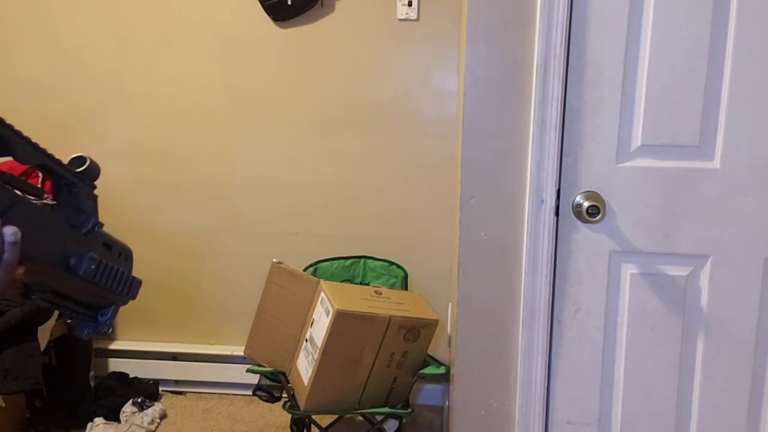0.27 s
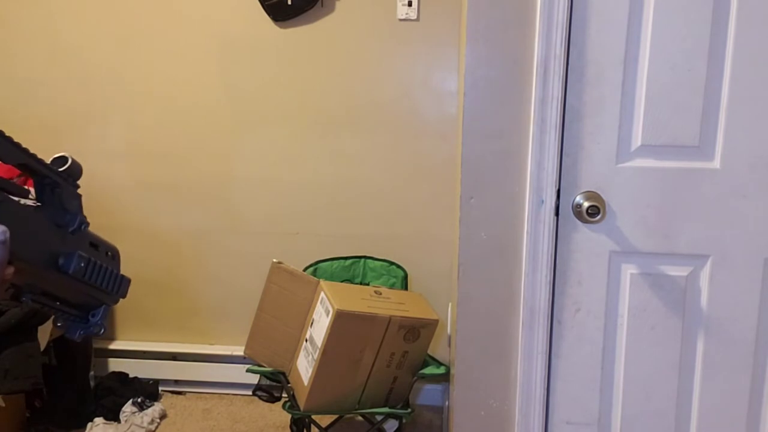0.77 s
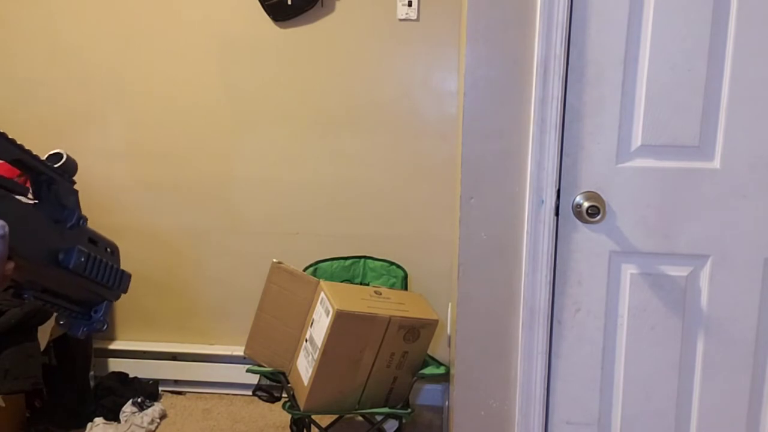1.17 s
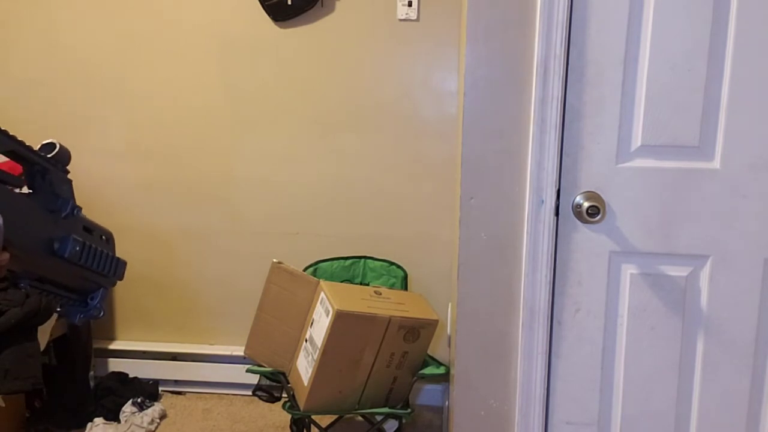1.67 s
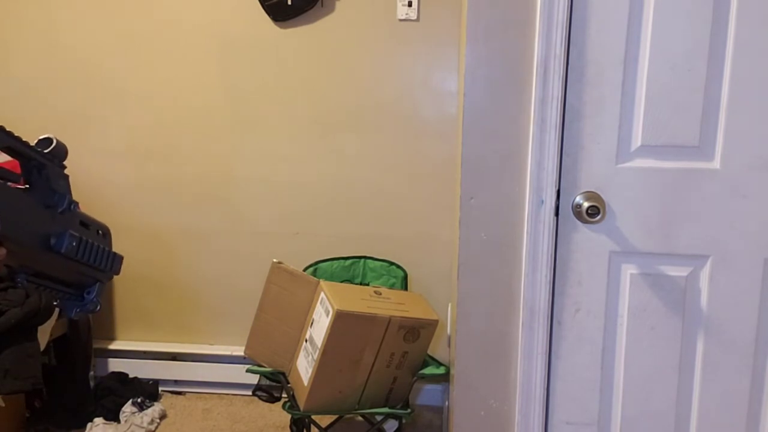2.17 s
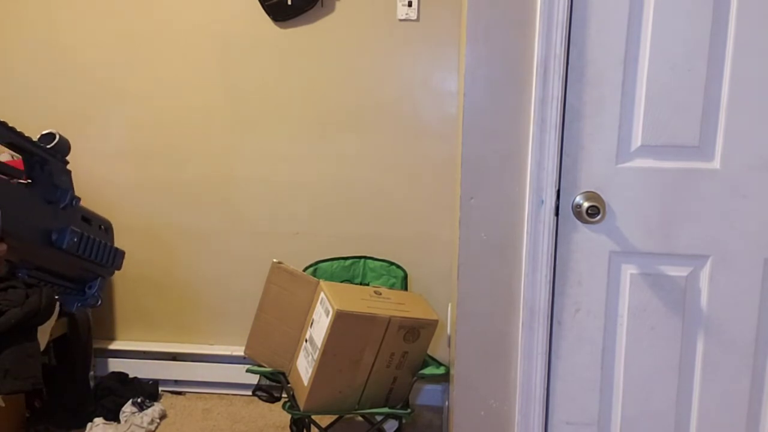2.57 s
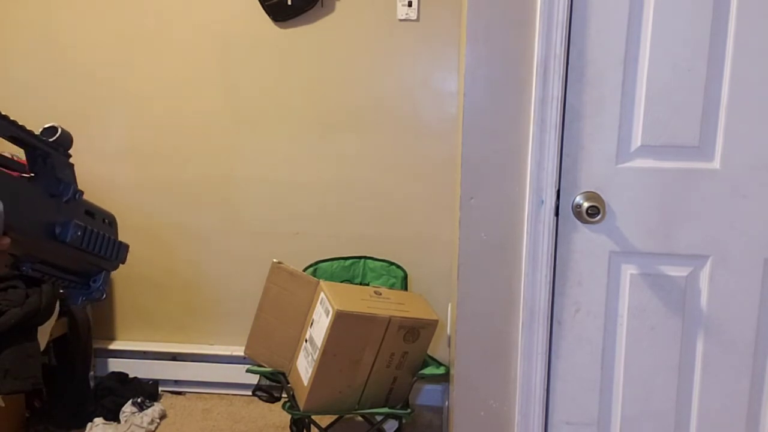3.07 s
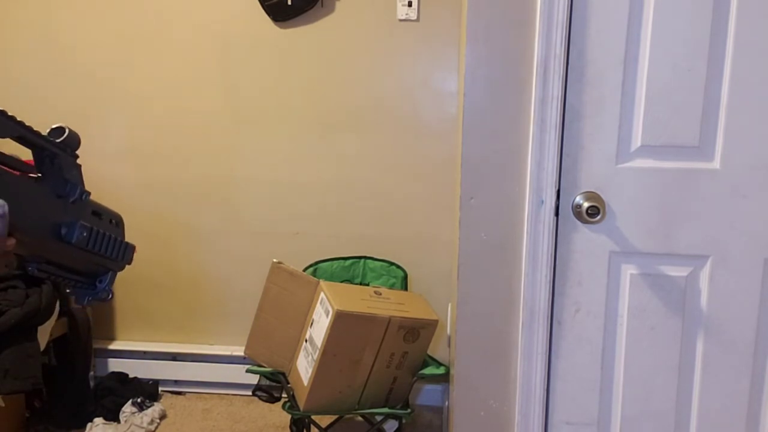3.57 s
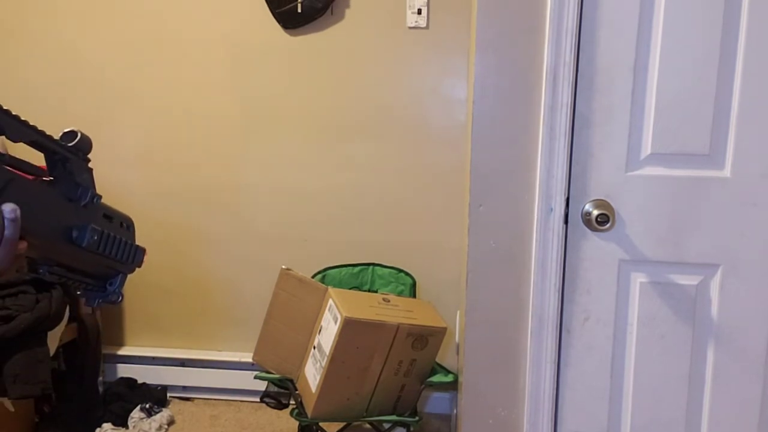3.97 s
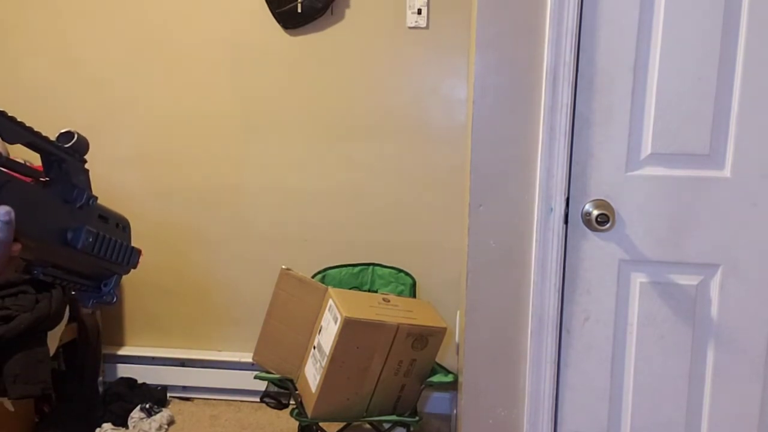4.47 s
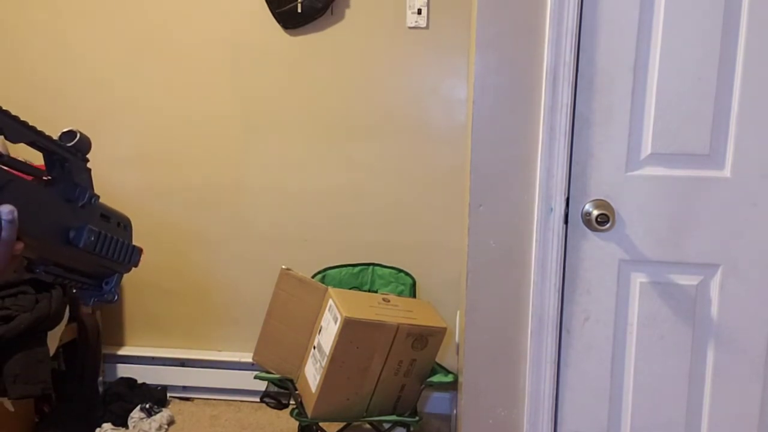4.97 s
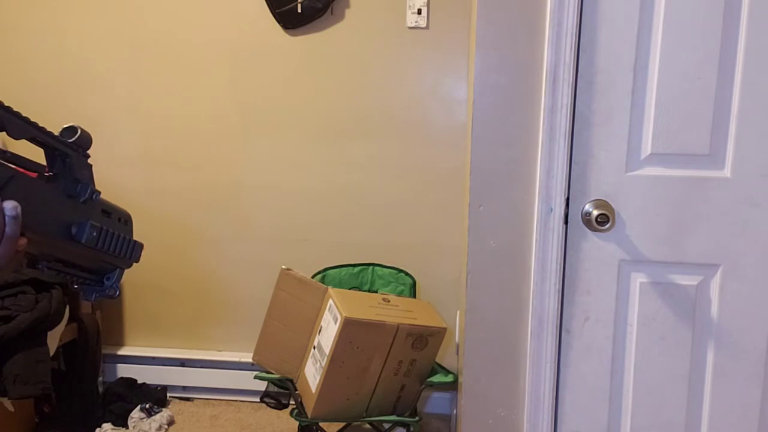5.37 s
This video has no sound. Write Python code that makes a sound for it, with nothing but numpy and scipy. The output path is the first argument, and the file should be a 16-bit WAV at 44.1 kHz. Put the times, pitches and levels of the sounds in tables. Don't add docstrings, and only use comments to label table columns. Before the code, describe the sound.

Quiet room air and low mains hum with a few light clicks and taps for about a second, then uneven semi-automatic airsoft fire until the end. Every shot has a roughly tenth-second motor zip rising into a loud, dry piston slap, followed at once by the pellet striking a cardboard box across the room and a short, hard-walled reverberation. Close, bass-light, limited sound.

```python
import sys
import numpy as np
from scipy import signal
from scipy.fft import rfft, irfft
from scipy.io import wavfile
from scipy.ndimage import uniform_filter1d

SR = 44100
rng = np.random.default_rng(int(sys.argv[2]) if len(sys.argv) > 2 else 0)


def makeup_ratio(level_db):
    decades = np.asarray(level_db, float) / 20
    return 10 ** decades


def persist_wave(psi):
    counts = np.round(np.clip(psi, -1, 1) * 32767).astype(np.int16)
    wavfile.write(sys.argv[1], SR, np.atleast_2d(counts).T)


N = 247401

SHOT_S = [1.0505, 1.3931, 1.6928, 2.3127, 2.582, 3.1185, 3.4182, 3.6965, 3.9738, 4.2588, 4.8169, 5.0992,
          5.5655]
# [start t/s, motor level/dB, first bite of the gears level/dB]
WINDING = [(0.956, -16.5, -16.5), (1.305, -25, -27), (1.6, -25.5, -33.5), (2.219, -26.5, -45),
           (2.49, -25.5, -33.5), (3.025, -27, -31), (3.324, -25.5, -30), (3.599, -26, -18),
           (3.876, -25.5, -18), (4.169, -24.5, -17.5), (4.727, -26, -38), (5.002, -27.5, -21.5),
           (5.472, -26, -41)]


def pop():
    # [f/Hz, level/dB]
    blast_spectrum = [(35, -93.5), (60, -10.5), (715, -5.5), (785, -1.5), (882, -2.5), (1220, 0),
                      (1740, -5.5), (2410, -7.5), (4530, -8), (5590, -6.5), (6740, 2.5), (10000, -15),
                      (13600, -21.5), (16000, -27.5)]
    # [f/Hz, level/dB, t60/s]
    barrel_modes = [(780, -4, .012), (2150, -10, .008)]
    # [f/Hz, level/dB, t60/s]
    release_modes = [(187, -46.5, 0.033), (841, -23.5, 0.012), (2420, -23, 0.0075)]
    # [delay t/ms, level/dB, sign]
    first_echoes = [(4.6, -3, -1), (6.4, -1, 1), (7.2, -4, 1), (10.3, -3, 1), (12.0, -6, -1),
                    (20.4, -4, -1)]
    shot_s = np.array(SHOT_S)
    slam = clicks(shot_s, 0)
    walls = sum(sign * clicks(shot_s + ms / 1000, db) for ms, db, sign in first_echoes)
    walls = bandpass(walls, 4500, 9500)
    new_echo = dying_noise(slam, first_ms=4.4, grainy=.8)
    barrel = strike(shot_s + .0018, 3, barrel_modes, spread_db=1)
    barrel = highpass(barrel, 2, 450)
    motor_db = np.array(WINDING)[:, 1]
    release = strike(shot_s - .011, motor_db + 32, release_modes, spread_db=2.0)
    blast, walls, new_echo = [colour(x, blast_spectrum) for x in (slam, walls, new_echo)]
    return blast, walls, new_echo, barrel, release


def motor():
    # [f/Hz, level/dB]
    gear_spectrum = [(180, -66.5), (300, -34), (519, -22.5), (645, -2), (1080, -6.5), (1280, -4.5),
                     (2030, -11.5), (2740, -5.5), (3350, -15.5), (5610, -12), (11300, -32), (16000, -53)]
    # [f/Hz, level/dB, t60/s]
    shell_modes = [(2365, -34, 0.022), (2900, -40, 0.018), (3950, -29.5, 0.012), (5750, -34, 0.017)]
    # [f/Hz, level over the motor/dB, t60/s]
    jolt_modes = [(830, -13, 0.048), (686, -16.5, 0.054)]
    spin_up_s, standstill_db = .014, -8.5
    strain_db_per_s = 18.5
    let_go_s, unloaded_db = 0.0028, -1.5
    full_mesh_hz, start_sag_hz = 1353, 249.7
    mesh_spread = 0.018

    t = np.arange(N) / SR
    level, speed, mesh_hz = np.zeros(N), np.zeros(N), np.ones(N)
    for (s, db, _), shot_s, chance in zip(WINDING, SHOT_S, rng.standard_normal(len(SHOT_S))):
        on = (t >= s) & (t < shot_s)
        speed[on] = 1 - np.exp(-(t[on] - s) / spin_up_s)
        strain_db = strain_db_per_s * (t[on] - (s + shot_s) / 2)
        strain_db += unloaded_db * (t[on] > shot_s - let_go_s)
        level[on] = makeup_ratio(db + standstill_db * (1.5 - speed[on]) + strain_db)
        mesh_hz[on] = full_mesh_hz * (1 + mesh_spread * chance) - start_sag_hz * np.sqrt(1 - speed[on])

    wobble = rms_one(signal.lfilter([1], [1, -.99], rng.standard_normal(N)))
    turns = np.cumsum(mesh_hz * (1 + .03 * wobble)) / SR
    teeth = np.diff(np.floor(turns), prepend=0) * makeup_ratio(3 * rng.standard_normal(N))
    whine = .55 * teeth * np.sqrt(SR / mesh_hz) + .35 * np.sin(2 * np.pi * turns)
    scrape = rng.standard_normal(N) * makeup_ratio(2.5 * wobble)
    contact = speed * whine + scrape

    start_s, motor_db, bite_db = np.transpose(WINDING)
    bite = fading(clicks(start_s, bite_db - 6), 3.4) * rng.standard_normal(N)
    drive = makeup_ratio(-8.0) * level * contact + bite
    shell = sum(makeup_ratio(db) * ring(drive, hz, t60) for hz, db, t60 in shell_modes)
    jolt = highpass(strike(start_s, motor_db, jolt_modes, spread_db=4.0), 6, 600)
    return jolt + colour(drive + shell, gear_spectrum)


def box():
    # [t/s, peak level/dB]
    hits = [(1.0665, -10), (1.4092, -10), (1.709, -10), (2.3276, -15), (2.597, -10), (3.1333, -9),
            (3.4336, -13), (3.712, -9), (3.9883, -15), (4.2737, -8), (4.8314, -7), (5.1144, -17),
            (5.5804, -15)]
    # [t/s, peak level/dB]
    bounces = [(1.159, -29.5), (1.499, -16.5), (1.801, -17.5), (2.423, -16.5), (2.684, -22), (3.223, -20.5),
               (3.556, -22.5), (3.809, -38), (4.079, -36.5), (4.369, -40.5), (4.944, -17), (5.205, -20)]
    # [f/Hz, level/dB, t60/s]
    crack_modes = [(750, -8, .02), (1050, -7, .015), (2950, 0, .012), (4200, -8, .005), (7000, -5, .004),
                   (13000, -14, .003)]
    # [f/Hz, level/dB, t60/s]
    tock_modes = [(650, -2, .07), (880, 1, .025), (4000, -14, .01)]
    hit_s, hit_db = np.transpose(hits)
    crack = strike(hit_s, hit_db + 15, crack_modes, spread_db=2.5)
    bounce_s, bounce_db = np.transpose(bounces)
    tock = strike(bounce_s, bounce_db - 3, tock_modes, spread_db=1)
    return highpass(crack, 6, 520), highpass(tock, 6, 520)


def trigger():
    # [t/s, peak level/dB]
    trigger_clicks = [
        (0.0005, -49),
        (0.0128, -33),
        (0.2119, -58),
        (0.9179, -39.5),
        (2.16, -56),
        (2.9786, -47.5),
        (4.6425, -57),
    ]
    # [f/Hz, level/dB]
    plastic_spectrum = [(180, -58.5), (300, -24), (394, -31), (527, -14), (1140, -3.5), (2670, -7.5),
                        (4190, -8), (7970, -15), (14000, -41)]
    # [t/s, level/dB, modes [f/Hz, level/dB, t60/s]]
    buckle = (.205, -58.5, [(1260, 0, 0.15), (1510, -6, .15), (1770, 1.5, 0.16)])
    s, db = np.transpose(trigger_clicks)
    click = clicks(s, db + 17)
    snap = makeup_ratio(-15) * fading(click, 5.6) * rng.standard_normal(N)
    echo = makeup_ratio(4.5) * dying_noise(click, first_ms=.6, grainy=.5)
    buckle_s, buckle_db, buckle_modes = buckle
    clink = strike([buckle_s], [buckle_db], buckle_modes, spread_db=3)
    return colour(snap + echo, plastic_spectrum) + clink


def taps():
    # [t/s, peak level/dB, length t/ms]
    finger_taps = [
        (0.2447, -45.5, 1.3),
        (0.284, -48, 1.37),
        (.3478, -43.5, 1.15),
        (.408, -36, 1.02),
        (0.4159, -36, 0.99),
        (4.649, -53.5, 1.2),
    ]
    push = np.zeros(N)
    for s, db, ms in finger_taps:
        push[int(s * SR):int((s + ms / 1000) * SR)] = -makeup_ratio(db)
    return bandpass(push, 120, 5000)


def background():
    # [f/Hz, level/dB]
    air_spectrum = [(25, -23.5), (100, -2.5), (200, -2.5), (400, -5.5), (700, -20), (2000, -16),
                    (4000, -26.5), (14000, -40.5)]
    # [f/Hz, level/dB, waver f/Hz, from t/s, to t/s]
    tones = [(333, -63, 4, .12, .55), (333, -68, 4, .7, .95), (1450, -79, 20, .25, .6),
             (1750, -81, 30, .45, .85), (2740, -76, 25, .28, .66), (2640, -81, 30, .7, .97),
             (2955, -78, 15, .7, .97), (4000, -90, 20, .3, .85), (893, -61, 2, 1.95, 2.3),
             (880, -66, 15, 4.3, 4.75)]
    air_db, mains_hz, mains_db = -70.5, 59.5, -61
    gain_drop_db, gain_drop_s = -10, .06

    t = np.arange(N) / SR
    out = makeup_ratio(air_db) * rms_one(colour(rng.standard_normal(N), air_spectrum))
    swing = rms_one(slow_noise(30))
    hum = rms_one(np.sin(2 * np.pi * mains_hz * t + .5 * swing))
    out += makeup_ratio(mains_db + 2.0 * swing) * hum
    for hz, db, waver_hz, start, stop in tones:
        sway = rms_one(slow_noise(np.pi * waver_hz))
        swell = np.sqrt(np.clip(np.minimum(t - start, stop - t) / .1, 0, 1))
        out += makeup_ratio(db + 4 * sway) * swell * np.sin(2 * np.pi * hz * t + 1.2 * sway)
    return out * makeup_ratio(np.interp(t, [SHOT_S[0], SHOT_S[0] + gain_drop_s], [0, gain_drop_db]))


def room(x, first_ms):
    return signal.fftconvolve(x, dying_noise(np.arange(SR) == 0, first_ms, grainy=.8))[:N]


def dying_noise(train, first_ms, grainy):
    # [f/Hz, t60/s]
    room_t60 = [(100, 0.16), (300, 0.25), (800, 0.35), (2200, 0.36), (5800, 0.34), (10000, 0.28),
                (15000, 0.23)]
    gather_cycles, gather_share = 40, .65
    late = np.concatenate([np.zeros(int(first_ms * SR / 1000)), train])[:len(train)]
    sparse = np.minimum(fading(late > 0, 45.0), 1)
    white = rng.standard_normal(len(late))
    grains = np.minimum(rng.exponential(1, len(late)), 4.5) ** 2.5 / 3.5
    white = white * (1 + grainy * sparse * (grains - 1))
    edges, tail = 50 * 2. ** np.arange(0, 8.7, .5), 0
    for k, (low, high) in enumerate(zip(edges, edges[1:])):
        band = (-1) ** k * bandpass(white, low, high, order=2)
        gather_ms = np.clip(1000 * gather_cycles / high, 3, 11)
        band *= 1 - gather_share * np.minimum(fading(late > 0, gather_ms), 1)
        t60 = at_hz(room_t60, np.sqrt(low * high))
        tail = tail + band * fading(late, 1000 * t60 / np.log(1000))
    return tail / np.sqrt(.025 * SR)


def strike(times, db, modes, spread_db):
    out, luck = 0, rng.standard_normal((len(times), len(modes)))
    for (hz, level_db, t60), chance in zip(modes, luck.T):
        blow_db = np.asarray(db) + level_db + spread_db * chance
        out = out + ring(clicks(times, blow_db), hz, t60)
    return out


def ring(x, hz, t60):
    r, w = makeup_ratio(-60 / (t60 * SR)), 2 * np.pi * hz / SR
    return signal.lfilter([0, np.sin(w)], [1, -2 * r * np.cos(w), r * r], x + 1e-18)


def clicks(times, db):
    out = np.zeros(N + SR)
    out[np.round(np.asarray(times) * SR).astype(int)] = makeup_ratio(db)
    return out[:N]


def fading(train, ms):
    return signal.lfilter([1], [1, -np.exp(-1000 / (ms * SR))], np.abs(train) + 1e-18)


def slow_noise(rate):
    return signal.lfilter([1], [1, -np.exp(-rate / SR)], rng.standard_normal(N + SR))[SR:]


def rms_one(x):
    return x / np.sqrt(np.mean(x ** 2) + 1e-30)


def at_hz(points, hz):
    table_hz, values = np.array(points).T
    return np.interp(np.log(hz + 1), np.log(table_hz), values)


def colour(x, spectrum, size=4096):
    cepstrum = irfft(np.log(makeup_ratio(at_hz(spectrum, np.fft.rfftfreq(size, 1 / SR)))))
    cepstrum[1:size // 2] *= 2
    cepstrum[size // 2 + 1:] = 0
    kernel = irfft(np.exp(rfft(cepstrum)))
    return signal.fftconvolve(x, kernel / np.linalg.norm(kernel))[:N]


def highpass(x, order, hz):
    return signal.sosfilt(signal.butter(order, hz, "high", fs=SR, output="sos"), x)


def bandpass(x, low, high, order=1):
    return signal.sosfilt(signal.butter(order, [low, high], "band", fs=SR, output="sos"), x)


def scene():
    blast, walls, new_echo, barrel, release = pop()
    crack, bounce = box()
    gears = motor()
    near = makeup_ratio(15) * blast + makeup_ratio(-9) * barrel + makeup_ratio(6) * release + makeup_ratio(0.5) * gears
    far = makeup_ratio(-19) * crack + makeup_ratio(-13) * bounce
    direct = makeup_ratio(9) * blast + barrel + release + gears + crack + bounce
    wet = makeup_ratio(18) * walls + makeup_ratio(19.5) * new_echo
    wet += room(near, first_ms=3.0) + room(far, first_ms=2.5)
    thin = highpass(direct + wet + trigger(), 4, 130)
    return (thin + taps() + background())[None]


def band_limit(x):
    return signal.sosfilt(signal.butter(12, 16510, fs=SR, output="sos"), x)


def record(dry):
    threshold_db, release_db_per_s, attack_s = -10.5, 260, 0.00013
    level_db = 10 * np.log10(uniform_filter1d(dry ** 2, size=221) + 1e-12)
    ramp = release_db_per_s * np.arange(N) / SR
    over_db = np.maximum.accumulate(np.maximum(level_db - threshold_db, 0) + ramp, axis=1) - ramp
    r = np.exp(-1 / (attack_s * SR))
    cut_db = signal.lfilter([1 - r], [1, -r], over_db)
    held = dry * makeup_ratio(-.9 * np.roll(cut_db, -66, axis=1))
    clipped = .76 * np.tanh(held / .76)
    top_cut = signal.sosfilt(signal.cheby2(10, 60, 16600, fs=SR, output="sos"), clipped)
    return band_limit(top_cut)


dry = scene()
out = record(dry)
persist_wave(out)
```